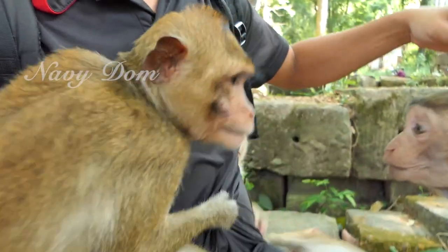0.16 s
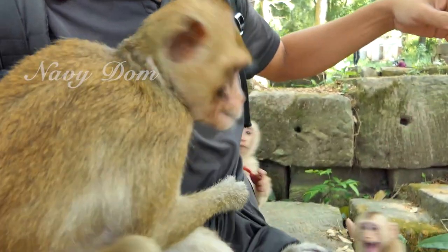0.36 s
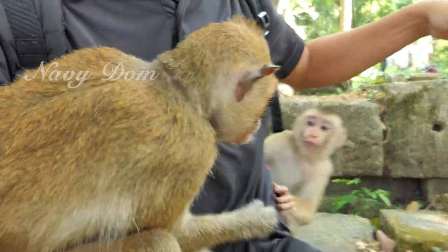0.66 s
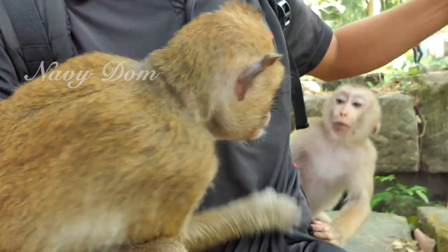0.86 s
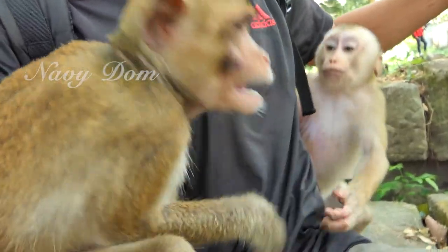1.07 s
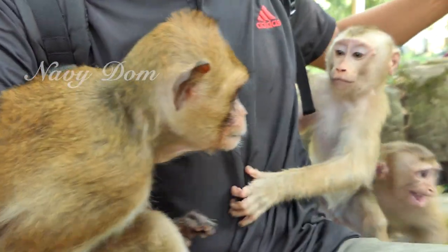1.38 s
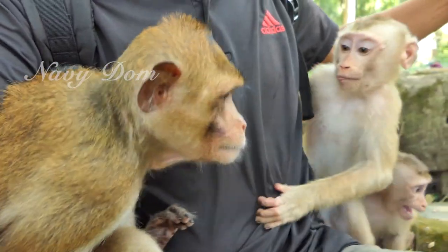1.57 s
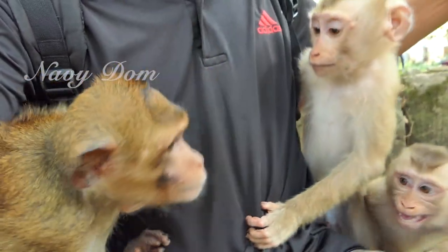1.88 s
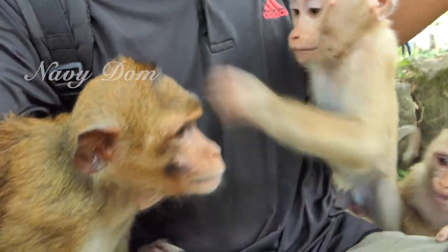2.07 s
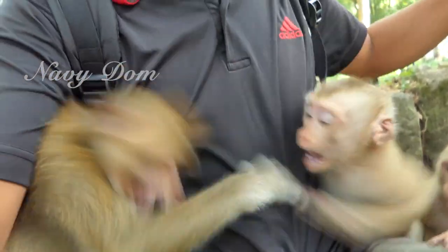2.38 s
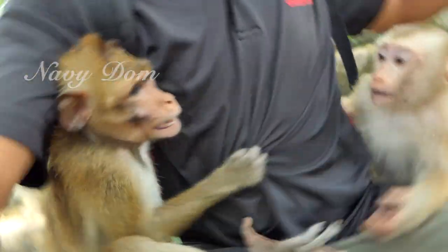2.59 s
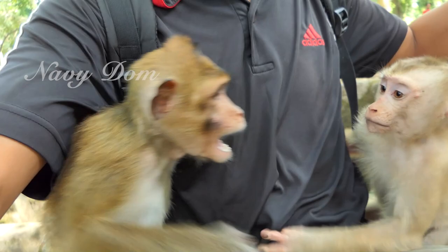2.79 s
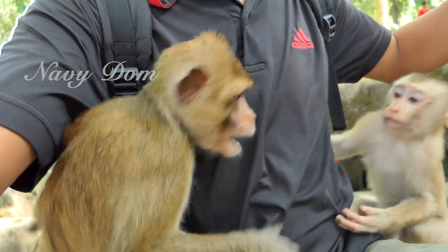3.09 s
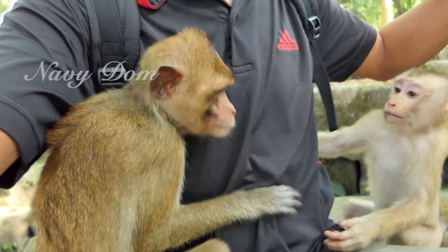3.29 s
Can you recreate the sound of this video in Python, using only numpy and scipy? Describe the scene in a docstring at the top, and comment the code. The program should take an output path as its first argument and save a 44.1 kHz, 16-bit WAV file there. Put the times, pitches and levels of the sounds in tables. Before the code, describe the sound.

A young monkey screams close to the microphone in short, very high squeals that climb, whistle and break raspy, scattered at first, then denser, with faint cloth rustle in a quiet outdoor place.

```python
"""Outdoors among stone walls, young macaques scream close by in a rapid run of squeals.
A squeal climbs as a reedy tone, flips into a thin whistle that arches and falls, and breaks into a rasp.
Tones are harmonics on drawn pitch curves; rasps mix a sliding noise band with a staggering tone.
Shaped noise makes the scuffle of fur on cloth and the quiet hush; soft low coos are pitch curves too.
The walls answer faintly with decaying noise echoes."""
import sys
import numpy as np
from scipy import signal
from scipy.fft import rfft, irfft, next_fast_len
from scipy.io import wavfile
from scipy.ndimage import map_coordinates

SR = 44100
rng = np.random.default_rng(int(sys.argv[2]) if len(sys.argv) > 2 else 0)


def digitize_waveform(pressure):
    """Quantize a signal to 16-bit integers and store it at the path in sys.argv[1].

    Rows of a 2-D input are taken as channels; values are limited to [-1, 1].
    """
    field = np.atleast_2d(pressure).T
    bounded = np.clip(field, -1, 1)
    quanta = np.round(bounded * 32767).astype(np.int16)
    wavfile.write(sys.argv[1], SR, quanta)


N = 152145

# outdoor hush spectrum [freq_hz, level_db]
HUSH_SPECTRUM = [(280, -1), (1200, -4.5), (10000, -14.5), (15500, -35)]
# upward flicks as the voice sets in [start_s, level_db before the harmonic mix]
FLICKS = [(1.322, -39), (1.999, -38), (2.362, -30), (3.216, -31)]
# reedy low register, one curve per tone [time_s, pitch_hz, level_db before the harmonic mix]
REEDY_TONES = [
    [(0.003, 4680, -39.5), (0.03, 7300, -32.5), (0.065, 4900, -37), (0.102, 6690, -34),
     (0.118, 6270, -36.5)],
    [(0.165, 5150, -47), (0.218, 4830, -45.5), (0.24, 6780, -45)],
    [(0.884, 4670, -40.5), (0.92, 6210, -32.5), (0.995, 5110, -29.5)],
    [(1.045, 5800, -32.5), (1.06, 6100, -33)],
    [(2.945, 2150, -37), (2.96, 2850, -31)],
    [(3.008, 4290, -29), (3.034, 4100, -43)],
]
# reedy climbs that open a squeal [start_s, end_s, top_pitch_hz, top_level_db before the harmonic mix]
CLIMBS = [(0.284, 0.325, 6050, -39), (0.609, 0.668, 8140, -35.5), (1.153, 1.177, 5750, -27.5),
          (1.33, 1.363, 7760, -23), (1.506, 1.543, 7060, -25.5), (1.738, 1.782, 7030, -29),
          (2.007, 2.034, 7360, -22), (2.368, 2.387, 6440, -18), (3.225, 3.249, 6540, -26)]
# whistling high register, one curve per tone [time_s, pitch_hz, level_db before the harmonic mix]
WHISTLES = [
    [(0.116, 10060, -29), (0.135, 9130, -37.5)],
    [(0.238, 10200, -35.5), (0.255, 9570, -37.5), (0.28, 8770, -43)],
    [(0.328, 10070, -37), (0.35, 8050, -42), (0.372, 8400, -42.5)],
    [(0.425, 9500.0, -39), (0.445, 6450, -33), (0.475, 7400, -38.5), (0.515, 11800, -38)],
    [(0.66, 11800, -38.5), (0.69, 11000, -31.5), (0.706, 9500, -36.5), (0.755, 8940, -43.5)],
    [(0.91, 12900, -35), (0.975, 11100, -33.5), (1.025, 8870, -29), (1.062, 9340, -33.5),
     (1.083, 5140, -33.5)],
    [(1.172, 10020, -37), (1.188, 12870, -24), (1.203, 8440, -36)],
    [(1.36, 10760, -36), (1.369, 12860, -23.5), (1.38, 11190, -19), (1.4, 10940, -19.5), (1.427, 9250, -23),
     (1.448, 3750, -19.5), (1.457, 3420, -19)],
    [(1.54, 12190, -29.5), (1.555, 9000, -28.5)],
    [(1.784, 10150, -26), (1.795, 10890, -23.5), (1.822, 10030, -29.5), (1.837, 6660, -29.5)],
    [(1.857, 5570, -27.5), (1.875, 4920, -33.5)],
    [(2.038, 10200.0, -22.5), (2.053, 10750, -18.5), (2.071, 8580, -22.5), (2.082, 6110, -31),
     (2.086, 4104, -20.5), (2.094, 3320, -39)],
    [(2.385, 9800, -31), (2.392, 11320, -18.5), (2.407, 9850, -31)],
    [(2.957, 5320, -29), (2.97, 7930, -29.5), (2.98, 8600, -30)],
    [(3.044, 4100.0, -32), (3.052, 5500.0, -21), (3.065, 3520, -20.5), (3.077, 3120, -21.5)],
    [(3.25, 8320, -39.5), (3.263, 10600, -28.5), (3.277, 9500, -21.5), (3.293, 7170, -44)],
]
# harmonic mixes of the two registers [multiple_of_pitch, level_db]
REEDY_HARMONICS = [(1, -5), (2, -5)]
WHISTLE_HARMONICS = [(.5, -15), (1, 0), (2, -27)]
# stretches where the strained voice loses its grip on the pitch [start_s, end_s]
STRAINED = [(.48, .685), (.905, .985), (1.065, 1.21), (1.535, 1.56)]
# turbulence in the throat [freq_hz, level_db]
AIR_SPECTRUM = [(1500, -16), (3500, 0.5), (12000, 3.5)]
# fur and cloth rubbing [centre_s, length_s, level_db before the grain]
RUSTLES = [(0.372, 0.022, -39), (0.401, 0.19, -42.5), (2.622, 0.0045, -40), (3.165, 0.062, -46)]
# spectrum of rubbed cloth [freq_hz, level_db]
CLOTH_SPECTRUM = [(250, 6), (3000, 7.5), (15000, -2.5)]
# soft bumps of hands and bodies [start_s, level_db before doubling and decay, pitch_hz]
BUMPS = [(0.34, -38, 235), (2.052, -31, 553), (2.517, -44, 464), (3.004, -46, 440)]
# the voice turns chaotic [start_s, end_s, middle_pitch_hz, middle_level_db, middle_treble_level_db]
RASPS = [(0.431, 0.464, 4510, -35, -39.5), (0.523, 0.567, 4606, -32, -36.5),
         (1.203, 1.25, 4237, -26.5, -31.5), (1.443, 1.454, 3976, -23.5, -53),
         (1.555, 1.6, 4320, -26.5, -35), (2.082, 2.091, 3796, -27.5, -40), (2.406, 2.475, 3915, -22, -31),
         (2.954, 2.987, 4910, -33.5, -40.5), (2.993, 3.005, 4096, -22, -35.5),
         (3.055, 3.08, 3847, -26, -44), (3.294, 3.316, 4050, -23.5, -38)]
# rasp body before it slides in pitch, and the hiss above it [freq_hz, level_db]
RASP_BODY_SPECTRUM = [(1500, -29.5), (2250, -6.5), (3500, 4), (6200, -2.5), (7800, -10.5), (11000, -34)]
RASP_TREBLE_SPECTRUM = [(6500, -22.5), (9300, 3), (12500, -5), (15500, -14)]
# the tone inside a rasp [multiple_of_a_third_of_its_pitch, level_db before levelling]
CORE_PARTIALS = [(2, -8), (3, 5), (4, 0), (5, 0)]
# soft calls, one curve per call [time_s, pitch_hz, level_db before the harmonic mix]
COOS = [
    [(.795, 252.5, -50), (.832, 259.3, -42), (.851, 313, -49)],
    [(2.565, 290, -52), (2.62, 365, -56.5)],
]
# stereo balance of the direct sound [freq_hz, left_minus_right_db]
BALANCE = [(500, 2), (2400, -8.5), (10000, -0.5)]

HUSH_DB = -56
FLICK_S, FLICK_FROM_HZ, FLICK_TO_HZ = .007, 4800, 7800
CLIMB_FROM_HZ, CLIMB_SWELL_DB = 3950, 18.5
CLIMB_BEND = 1.4  # above 1, the climb starts slowly and steepens
ATTACK_S, RELEASE_S = .00068, .0017
STRAIN_JITTER = .03  # extra pitch waver under strain, as a fraction
UNDERTONE_FROM_HZ = 10400
BUMP_DECAY_S, BUMP_ATTACK_S = .0024, .00011
RASP_ATTACK_S, RASP_RELEASE_S = .0051, .0053
RASP_CENTRE_HZ = 4000  # the pitch at which the body spectrum plays unshifted
RASP_FALL = .27  # natural log of the pitch drop over a rasp
RASP_SWELL_DB, RASP_DARKEN_DB = 1.5, 9  # over a rasp the body grows and the treble fades
RASP_PULSING_DB = 1.6
CORE_DB, CORE_RATIO, CORE_JITTER = 0, .9, .05  # level against the body, pitch against it, stagger
PATCHY_DB, EAR_PATCHY_DB = 2.4, 2.2  # colour shifts shared by both sides, and of each side alone
PATCH_HZ, PATCH_S = 520, .03
WALLS_DB, WALLS_T60_S = -19, .33
EARLY_DB, EARLY_DECAY_S = -12, .013
LEFT_LEAD_S = .000008
LOW_CUT_HZ, ROLL_OFF_HZ, TOP_HZ = 67, 14000, 15900


def amp(db):
    """Decibels to amplitude."""
    return 10 ** (np.asarray(db) / 20)


def unit(x):
    """x levelled to an rms of 1."""
    return x / np.sqrt(np.mean(x ** 2) + 1e-20)


def clock():
    """Time of every sample, in seconds."""
    return np.arange(N) / SR


def along(points, hz):
    """Interpolate (Hz, value) points on a log frequency axis."""
    freqs, values = np.transpose(points)
    return np.interp(np.log(hz + 1), np.log(freqs + 1), values)


def wobble(rate):
    """A smooth random curve, rate knots a second."""
    return map_coordinates(rng.standard_normal(N // 4), [clock() * rate], mode="wrap")


def filtered(x, response):
    """x shaped by a response of frequency."""
    size = next_fast_len(N + SR // 2)
    spectrum = rfft(x, size) * response(np.fft.rfftfreq(size, 1 / SR))
    return irfft(spectrum, size)[..., :N]


def noise(spectrum):
    """Coloured noise of rms 1."""
    return unit(filtered(rng.standard_normal(N), lambda hz: amp(along(spectrum, hz))))


def gate(start, end, attack, release):
    """Full between start and end, with a Gaussian rise before and an exponential decay after."""
    t = clock()
    rise = (np.maximum(start - t, 0) / attack) ** 2
    decay = np.maximum(t - end, 0) / release
    return np.exp(-rise - decay)


def forest():
    """A quiet, wide outdoor hush: noise partly shared by the two sides."""
    common = noise(HUSH_SPECTRUM)
    sides = np.array([common + .77 * noise(HUSH_SPECTRUM) for _ in range(2)])
    return amp(HUSH_DB) * unit(sides)


def voice(tones, harmonics, jitter, shimmer_db, air_db):
    """Vocal folds follow each pitch curve, unsteadily under strain; air hisses along with the tone."""
    out = np.zeros(N)
    t = clock()
    strain = sum(gate(start, end, RASP_RELEASE_S, RASP_RELEASE_S) for start, end in STRAINED)
    waver = 1 + (jitter + STRAIN_JITTER * strain) * (wobble(2500) + .5 * wobble(250))
    flutter = amp(shimmer_db * unit(wobble(220) + .5 * wobble(2000)))
    air = amp(air_db) * noise(AIR_SPECTRUM)
    for curve in tones:
        times, hz, db = np.transpose(curve)
        near = (t > times[0] - .01) & (t < times[-1] + .03)
        pitch = np.interp(t[near], times, hz) * waver[near]
        phase = 2 * np.pi * np.cumsum(pitch) / SR
        # only the highest notes grow an undertone
        undertone = np.clip(10 * (pitch / UNDERTONE_FROM_HZ - 1), 0, 1)
        tone = 0
        for k, level in harmonics:
            presence = undertone if k < 1 else k * pitch < SR / 2
            tone = tone + np.sqrt(2) * amp(level) * np.sin(k * phase) * presence
        envelope = amp(np.interp(t[near], times, db))
        envelope = envelope * gate(times[0], times[-1], ATTACK_S, RELEASE_S)[near]
        out[near] += envelope * (tone * flutter[near] + air[near])
    return out


def squeals():
    """The pitched parts of the screams: flicks, reedy tones and climbs, whistles."""
    flicks = [[(s, FLICK_FROM_HZ, db), (s + FLICK_S, FLICK_TO_HZ, db)] for s, db in FLICKS]
    climbs = []
    u = np.linspace(0, 1, 10)
    for start, end, top_hz, top_db in CLIMBS:
        times = start + (end - start) * u
        pitch = CLIMB_FROM_HZ * (top_hz / CLIMB_FROM_HZ) ** (u ** CLIMB_BEND)
        level = top_db - CLIMB_SWELL_DB * (1 - u)
        climbs.append(np.transpose([times, pitch, level]))
    out = voice(flicks, [(1, 0), (2, -10)], jitter=.01, shimmer_db=1, air_db=-14)
    out += voice(list(REEDY_TONES) + climbs, REEDY_HARMONICS, jitter=.024, shimmer_db=3, air_db=-7)
    out += voice(WHISTLES, WHISTLE_HARMONICS, jitter=.012, shimmer_db=2.2, air_db=-19)
    return out


def shifting(x):
    """The colour of the screams shifts in narrow bands, partly alike and partly different on the two sides."""
    hz, t, bins = signal.stft(x, SR, nperseg=256)
    grid = np.meshgrid(hz / PATCH_HZ, t / PATCH_S, indexing="ij")
    shared, left, right = [map_coordinates(rng.standard_normal(bins.shape), grid) for _ in range(3)]
    gain = amp(PATCHY_DB * shared + EAR_PATCHY_DB * np.array([left, right]))
    return signal.istft(bins * unit(gain), SR, nperseg=256)[1][:, :N]


def walls(x):
    """Quick scatter from ground and bodies, then a faint tail from stones and trees."""
    t = np.arange(SR) / SR
    tail, early = rng.standard_normal((2, 2, SR))
    tail = tail * amp(-60 * t / WALLS_T60_S)
    early = early * np.exp(-t / EARLY_DECAY_S)
    answer = amp(WALLS_DB) * tail / np.linalg.norm(tail[0])
    answer = answer + amp(EARLY_DB) * early / np.linalg.norm(early[0])
    return signal.fftconvolve(x[None], answer, axes=1)[:, :N]


def scuffle():
    """Grainy noise swells of fur rubbing cloth, and dull bumps of decaying sine and noise."""
    t = clock()
    rub = sum(amp(db) * np.exp(-(2 * (t - s) / length) ** 2) for s, length, db in RUSTLES)
    grain = amp(2.44 * wobble(400))
    out = rub * unit(noise(CLOTH_SPECTRUM) * grain)
    for s, db, hz in BUMPS:
        age = np.maximum(t - s, 0)
        envelope = 2 * np.exp(-age / BUMP_DECAY_S) * (1 - np.exp(-age / BUMP_ATTACK_S))
        thud = np.sin(2 * np.pi * hz * age) + .43 * noise(CLOTH_SPECTRUM)
        out += amp(db) * envelope * thud
    return out


def rasps():
    """Chaotic vibration: a staggering tone split into thirds, in a sinking noise band under fading hiss."""
    t, out = clock(), np.zeros(N)
    band, treble = noise(RASP_BODY_SPECTRUM), noise(RASP_TREBLE_SPECTRUM)
    stagger = np.exp(CORE_JITTER * wobble(900))
    for start, end, hz, db, treble_db in RASPS:
        near = (t > start - .02) & (t < end + .08)
        # runs from +.5 at the start of the rasp to -.5 at its end
        early = .5 - np.clip((t[near] - start) / (end - start), 0, 1)
        pitch = hz * np.exp(RASP_FALL * early)
        # reading the noise faster or slower slides the whole band in pitch
        body = map_coordinates(band, [start * SR + np.cumsum(pitch / RASP_CENTRE_HZ)], mode="wrap")
        third_phase = 2 * np.pi * np.cumsum(CORE_RATIO * pitch * stagger[near]) / SR / 3
        core = unit(sum(amp(level) * np.sin(k * third_phase + rng.uniform(-np.pi, np.pi))
                        for k, level in CORE_PARTIALS))
        growl = amp(db - RASP_SWELL_DB * early) * unit(body + amp(CORE_DB) * core)
        hiss = amp(treble_db + RASP_DARKEN_DB * early) * treble[near]
        out[near] += gate(start, end, RASP_ATTACK_S, RASP_RELEASE_S)[near] * (growl + hiss)
    return out * amp(RASP_PULSING_DB * wobble(450))


def coo():
    """Soft, low, rising calls: a nearly pure voice with little breath."""
    return voice(COOS, [(1, -2), (2, -22)], jitter=.0049, shimmer_db=.5, air_db=-15)


def scene():
    """Animals close by, all sharing one stereo balance and a slight lead on the left, with echoes and hush."""
    close = shifting(squeals() + rasps()) + coo() + scuffle()
    side = np.array([[.5], [-.5]])  # each side takes half of the left-right difference

    def placement(hz):
        lead = np.exp(2j * np.pi * hz * LEFT_LEAD_S * side)
        return amp(along(BALANCE, hz) * side) * lead

    return filtered(close, placement) + walls(close.mean(axis=0)) + forest()


def record(dry):
    """Thin the deep bass, dull the very top and keep nothing from the band limit up."""
    def response(hz):
        bass = hz ** 2 / np.hypot(hz ** 2, LOW_CUT_HZ ** 2)
        top = 1 / np.hypot(1, (hz / ROLL_OFF_HZ) ** 10)
        return (hz < TOP_HZ) * bass * top

    return filtered(dry, response)


dry = scene()
out = record(dry)
digitize_waveform(out)
```